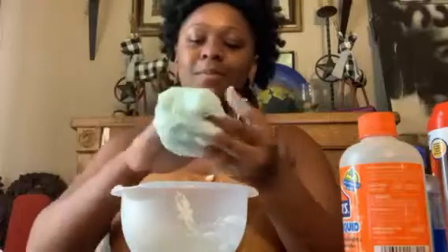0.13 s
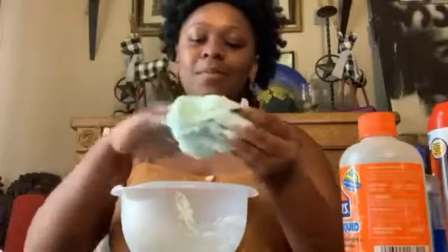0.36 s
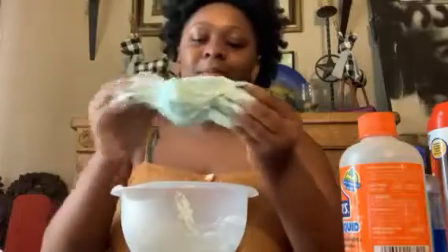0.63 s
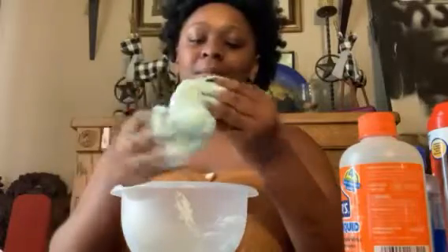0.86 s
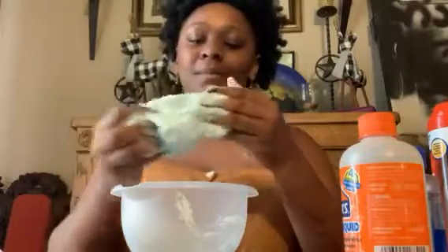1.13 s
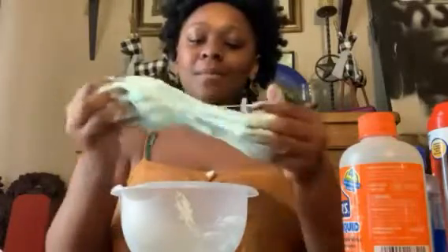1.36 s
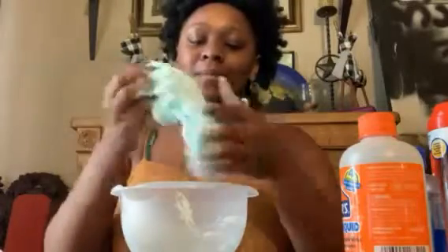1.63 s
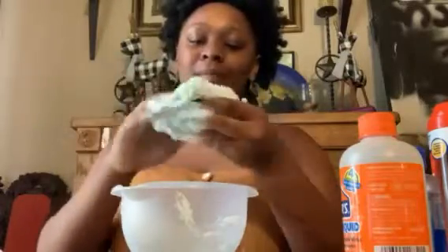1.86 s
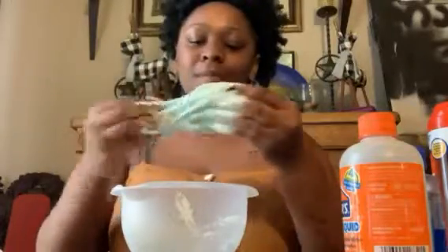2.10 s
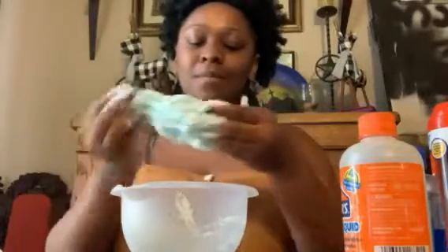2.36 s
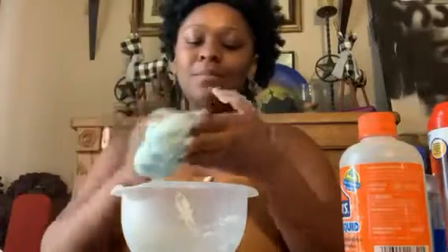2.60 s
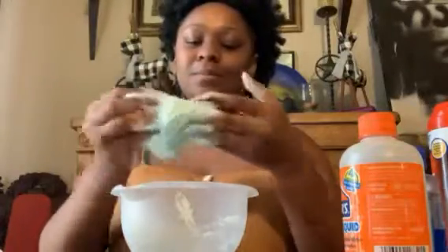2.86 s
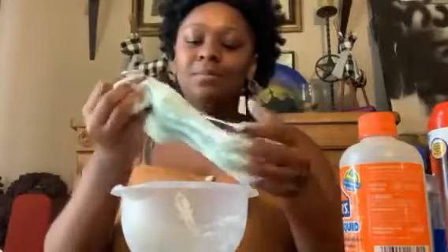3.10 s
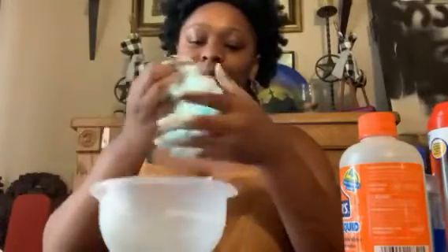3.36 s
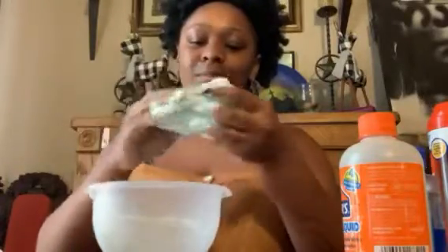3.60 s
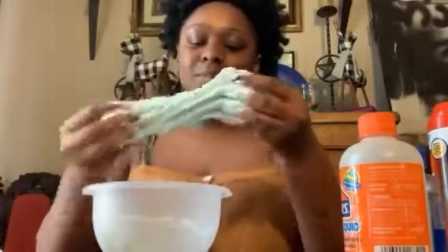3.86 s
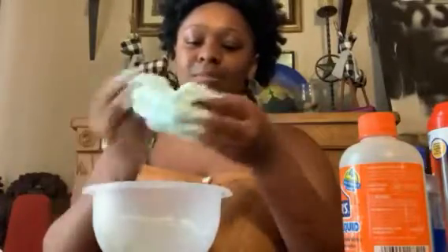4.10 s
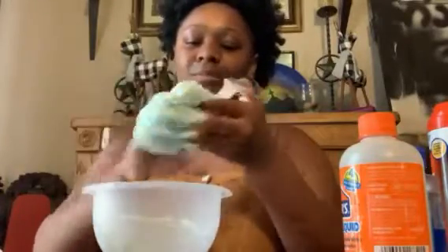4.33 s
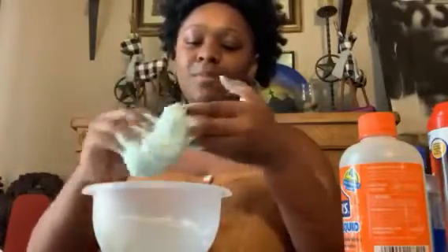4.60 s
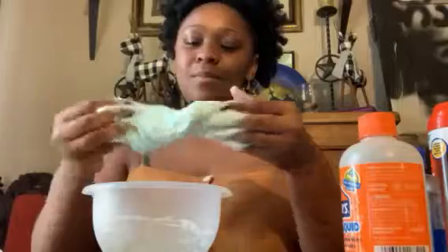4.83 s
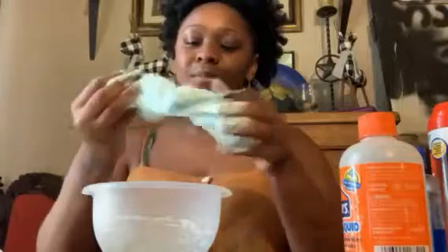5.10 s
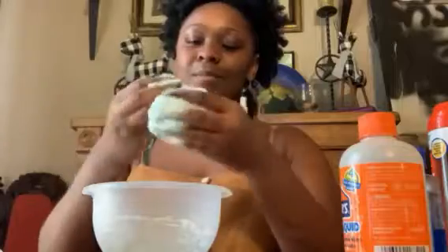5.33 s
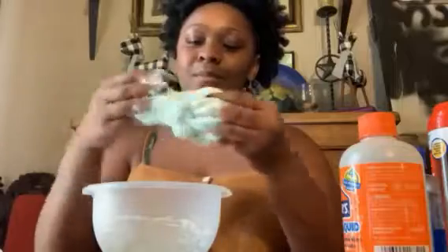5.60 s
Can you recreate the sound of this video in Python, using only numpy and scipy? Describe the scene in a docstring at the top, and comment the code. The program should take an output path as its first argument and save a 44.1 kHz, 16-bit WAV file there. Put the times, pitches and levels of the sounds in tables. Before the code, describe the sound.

Fine wet crackles and bubble pops from hand-stretched slime in a quiet room, interrupted by a loud rattling bump on a table.

```python
"""Room tone and a thin whine, then hands kneading sticky slime: fine wet crackle with single pops.
Midway the table is jolted: it booms while a thing on it scrapes, crackles and rattles to rest.
A wavering low drone comes and goes; faint rubs and short squeaks join in.
Crackle is unevenly jumping noise plus bubble grains; pops are short cycles with noise bursts; the
jolt rings damped modes. Sparse reflections add a room; two close microphone ports pick it all up."""
import sys
import numpy as np
from scipy import signal
from scipy.fft import rfft, irfft, next_fast_len
from scipy.io import wavfile
from scipy.ndimage import uniform_filter1d

SR = 44100
rng = np.random.default_rng(int(sys.argv[2]) if len(sys.argv) > 2 else 0)


def makeup_ratio(level_db):
    """Linear amplitude ratio for a level in decibels (20 dB per factor of ten)."""
    decades = np.asarray(level_db, float) / 20
    return 10 ** decades


def store_pcm(level_fs):
    """Save levels as 16-bit WAV."""
    pcm = np.round(np.clip(level_fs, -1, 1) * 32767).astype(np.int16)
    wavfile.write(sys.argv[1], SR, np.atleast_2d(pcm).T)


N = 251811

# Room tone spectrum. Each row: frequency in Hz, relative density in dB.
AIR = [(18, -37), (46, 1.5), (86, 3), (289, -16.5), (809, -21), (1600, -27.5), (2090, -25), (2650, -30),
       (6150, -32.5), (11300, -31), (13900, -30), (16300, -61)]
# Likeness of the room tone at the two ports. Each row: frequency in Hz, correlation.
AIR_SAME = [(40, 0.4), (1000, 0.22), (12000, 0.16)]
# Thin whine. Each row: time in seconds, pitch in Hz, rms level in dB.
WHINE = [(0., 10960, -91), (4.38, 11020, -88.5), (4.42, 11130, -94), (5.7, 10960, -82)]
# Strokes of crackle, from slime and, between 3.2 and 3.8 s, from the jolt. Each row: peak time,
# rise and fall in seconds, crackle level in dB, tilt towards the lows in dB.
CRACKLE_STROKES = [(0.147, 0.071, 0.072, -61, -9), (.33, 0.024, 0.42, -66, -10.5),
                   (.54, 0.32, 0.091, -65.5, -17), (0.691, 0.079, 0.13, -62.5, -4.5),
                   (1.3, 0.77, 0.056, -67, -3.5), (1.429, 0.26, 0.041, -60.5, -37),
                   (1.82, 0.21, 0.21, -64, -12.5), (1.966, 0.036, 0.041, -55.5, -8.5),
                   (2.058, 0.093, 0.1, -58, -11), (2.345, 0.28, 0.31, -75, -3),
                   (2.733, 0.072, 0.081, -54, -6.5), (2.973, 0.7, 0.26, -60.5, -21.5),
                   (3.2, 0.091, 0.17, -74.5, 18), (3.449, 0.15, 0.088, -63, 17),
                   (3.668, 0.059, 0.063, -49.5, 5.5), (3.77, 0.12, 0.15, -61.5, -6.5),
                   (4.361, 0.33, 0.12, -62, -8.5), (4.609, 0.017, 0.041, -62, -13),
                   (4.69, 0.043, 0.17, -59, -11.5), (5.038, 0.3, 0.047, -67, -27),
                   (5.236, 0.017, 0.061, -66, 7), (5.373, 0.09, 0.13, -68, -4.5),
                   (5.517, 0.024, 0.12, -59, 4.5), (5.69, 0.24, 0.12, -59, -8)]
# Crackle spectrum. Each row: frequency in Hz, relative density in dB.
CRACKLE = [(120, -31), (200, -4), (329, 3), (650, -4.5), (796, -15.5), (1380, -3.5), (1540, -20), (2070, 3),
           (2590, -11.5), (4410, -6), (7120, -12.5), (11700, -5), (13800, -6), (16300, -34.5)]
# Bursting air pockets. Each row: cue in seconds (2 ms before the burst), level in dB,
# pocket pitch in Hz, relative snap level in dB.
POPS = [(0.117, -48.5, 2240, -14.5), (0.414, -38, 2370, -5.5), (0.422, -41, 2540, -13),
        (0.433, -48, 3200, -12), (0.457, -51, 1400, -22), (0.673, -34.5, 4400, -44),
        (0.679, -52, 3970, -28), (0.69, -45, 3000, -10), (0.698, -52.5, 2900, 5.5), (0.855, -48, 355, 1),
        (1.007, -44, 300, -2.5), (1.039, -37, 420, -10.5), (1.083, -47.5, 290, -0.5),
        (1.177, -39, 4700, -6.5), (1.207, -42.5, 1876, 0.5), (1.23, -37.5, 1340, -5.5),
        (1.252, -53, 1200, -11), (1.288, -52, 1200, 3), (1.323, -38.5, 4640, -19), (1.623, -49.5, 2140, -2),
        (1.701, -46, 1970, -13), (1.82, -44, 2190, -2), (1.955, -55.5, 2130, 7.5), (2.03, -48, 426, 2),
        (2.091, -56, 2010, 9), (2.335, -52, 1290, -2), (2.506, -50, 1400, -27), (2.723, -37.5, 338, -11.5),
        (2.744, -41, 705, -7), (2.869, -39, 2050, -23.5), (2.938, -42.5, 1820, -5.5),
        (2.97, -44.5, 1900, 3), (4.204, -39.5, 1720, -12), (4.34, -52, 884, 7.5), (4.69, -32.5, 634, -8),
        (4.729, -42.5, 677, 1.5), (4.889, -47, 1937, -1), (4.917, -40, 2116, -12), (4.93, -53, 2070, 0.5),
        (4.95, -39, 2080, -9), (5.042, -47, 1870, -8.5), (5.197, -47, 939, -18), (5.209, -38.5, 3260, -9),
        (5.238, -48, 405, -16), (5.285, -45.5, 2110, -12.5), (5.3636, -36, 4100, -5.5),
        (5.456, -37, 2350, -11.5), (5.504, -28, 4490, -20.5), (5.51, -35.5, 2215, -20),
        (5.522, -43.5, 2300, -2.5), (5.551, -41.5, 543, -3), (5.563, -36.5, 4820, -6),
        (5.604, -23, 2670, -19.5), (5.677, -40, 3240, -9.5)]
# Room decay. Each row: frequency in Hz, t60 in seconds.
ROOM = [(200, 0.55), (1000, 0.082), (4000, 0.32), (12000, 0.074)]
# Rubs that wake the bright modes. Each row: peak time, rise and fall in seconds, level in dB.
RUBS = [(1.2, 0.92, 0.32, -72.5), (3.78, 0.034, 0.28, -71.5), (4.02, 0.12, 0.15, -68),
        (4.944, 0.11, 0.12, -69)]
# Low drone, one list a passage. Each row: time in seconds, mean pitch in Hz, mean level in dB.
DRONE = [
    [(.3, 83.4, -76), (.55, 86.8, -70), (.9, 91.6, -62.5), (1.13, 95.8, -61), (1.3, 98.4, -75.5),
     (1.44, 96.6, -62), (1.7, 90.6, -94)],
    [(3.8, 76.3, -55.5), (4.19, 81.6, -58.5), (4.27, 78.4, -70), (4.4, 79.4, -59.5), (4.56, 82.3, -84),
     (4.64, 84.2, -60), (4.7, 85.5, -81.5)],
]
# Faint squeaks, one list each. Each row: time in seconds, mean pitch in Hz, mean level in dB.
SQUEAKS = [
    [(2.635, 560, -75), (2.68, 560, -64.5), (2.705, 540, -75)],
    [(2.765, 700, -67), (2.8, 650, -69), (2.815, 640, -66)],
]
# Creaking drags. Each row: peak time, rise and fall in seconds, level in dB.
DRAGS = [(3.14, 0.039, 0.037, -72.5), (3.195, 0.0232, 0.049, -41.5)]
# Modes of the dragged foot. Each row: frequency in Hz, relative level in dB, t60 in seconds.
DRAG_MODES = [(762, 1.5, 0.023), (900, -1.5, 0.028), (1377, -7.5, .02), (2072, -13.5, .018),
              (2330, -9.5, 0.017)]
# Knocks of the rattle. Each row: start in seconds, body peak in dB, hardness as relative crack
# level in dB, pitch in Hz about which the modes are loudest.
KNOCKS = [(3.117, -51.5, -11.5, 820), (3.245, -24.5, -22, 680), (3.253, -14.5, -18.5, 946),
          (3.259, -16, -20, 900), (3.27, -16.5, -16.5, 932.6), (3.279, -23, -21, 880),
          (3.287, -26, -20.5, 600), (3.379, -3, -15.5, 750), (3.395, -14.5, -23.5, 600),
          (3.407, -17, -30, 690), (3.421, -21.5, -23, 800), (3.4432, -13.5, -12, 960),
          (3.455, -20.5, -18, 900), (3.461, -22.5, -18.5, 850), (3.498, -19, -21.5, 460),
          (3.506, -20.5, -21, 850), (3.534, -19.5, -11, 1130), (3.543, -22, -28.5, 603),
          (3.548, -20.5, -27, 809), (3.562, -24, -19.5, 600), (3.582, -16, -17, 850),
          (3.615, -23.5, -15.5, 1000), (3.623, -22, -18, 850), (3.635, -20, -20, 870),
          (3.643, -21.5, -19.5, 780), (3.658, -20.5, -20, 790), (3.675, -22, -18.5, 900),
          (3.693, -26, -19.5, 900), (3.711, -26, -21.5, 700), (3.732, -29.5, -22, 750)]
# Body modes of the thing. Each row: nominal frequency in Hz, relative level in dB, t60 in seconds.
BODY = [(246.2, -13.5, .045), (301.5, -10.5, 0.045), (395.2, -4.5, 0.024), (560, -4, 0.019),
        (734, 0.5, 0.015), (850, -1, 0.017), (962, 2, 0.014), (1200, -6, 0.016), (1400, -4.5, 0.014),
        (1656, -6.5, 0.014)]
# Its bright modes. Each row: nominal frequency in Hz, relative level in dB, nominal t60 in seconds.
BRIGHT = [(2060, -8, 0.011), (2140, -3, 0.014), (2378, -12, 0.011), (3330, -14, 0.008)]
# Spectrum of the hard contact. Each row: frequency in Hz, relative density in dB.
CRACK = [(1410, -30.5), (2400, -19.5), (2730, -8.5), (3460, -4), (6950, -17.5), (13400, -27.5),
         (16000, -49)]
# Table-top modes. Each row: nominal frequency in Hz, relative level in dB, t60 in seconds.
TABLE_TOP = [(61.85, -6.5, 0.16), (90, -7, 0.13), (95.1, 2.5, .18), (115.6, 3.5, 0.11), (121.5, 4.5, 0.15)]
# Slides during the jolt. Each row: peak time, rise and fall in seconds, scrape level in dB.
SLIDES = [(3.262, 0.0092, 0.072, -40.5), (3.39, 0.018, 0.12, -32), (3.547, 0.052, 0.13, -32),
          (3.66, 0.095, 0.037, -33)]
# Phase between the ports. Each row: frequency in Hz, lead of the left in radians.
PORT_PHASE = [(0, 0), (1290, -0.3), (1550, 0.6), (1890, -0.1), (2670, -1.0), (3360, -0.0), (4050, -2.2),
              (6200, -0.3), (7320, -3.4), (8870, -2.6), (10700, -0.3), (13000, 0.1), (14600, 2.8),
              (16000, 3.3)]
# Level between the ports. Each row: frequency in Hz, left minus right in dB.
PORT_BALANCE = [(60, 5.5), (110, 2.5), (200, -1), (380, -1), (700, 3), (1290, -5.5), (2380, 2.5),
                (4400, -4), (8120, 9.5), (15000, -4)]

AIR_DB = -68
SAG_DB = 18  # a stroke is this much weaker at its two ends than at its peak
# decay beyond the ends of a stroke
CRACKLE_STOP_DB_PER_S, SLIDE_STOP_DB_PER_S, RUB_STOP_DB_PER_S, DRAG_STOP_DB_PER_S = 330, 100, 250, 470
SNAP_SHARE, FIZZ_SHARE = 1.2, 0.35  # uneven snaps against the even fizz beneath them
BUBBLE_LOW_HZ, BUBBLE_HIGH_HZ, BUBBLES_PER_S = 600, 4500, 300
BUBBLE_CYCLES, BUBBLE_GLIDE = 3, 0.25
BUBBLE_DB = -6  # against the low part of the crackle
WIDE_BELOW_HZ, WIDE_HZ = 800, 3000  # large pockets smack over a wide band; small ones near their pitch
RUB_DAMPING, RUB_SHIFT = 0.99, 1.019  # the rubbing contact shortens the ring and stiffens the modes
WAVER_DB, OCTAVE_WAVER_DB = 2.5, 3.5  # rms of the random swelling of the partials
PITCH_WAVER, SQUEAK_BLUR = 0.02, 0.02  # rms shares of pitch
OCTAVE_DB, OCTAVE_DB_PER_HZ = -14, 0.8  # second partial where the first is at 90 Hz; growth with pitch
SPOT_DB = 4  # how much the struck spot changes each mode
FOCUS_DB_PER_OCTAVE = 9  # modes far from the loudest ring of a knock are weaker
BRIGHT_DB, BRIGHT_PER_HARDNESS = 8.5, 1  # harder knocks wake the bright modes more


def evened(x):
    """Scales to rms 1."""
    return x / np.sqrt(np.mean(x ** 2) + 1e-20)


def read(points, hz):
    """Reads a spectrum table on a log-frequency axis."""
    f, value = np.transpose(points)
    return np.interp(np.log(hz + 1), np.log(f + 1), value)


def add(mix, s, sound):
    """Mixes a sound in at time s."""
    part = mix[..., round(s * SR):][..., :sound.shape[-1]]
    part += sound[..., :part.shape[-1]]


def follow(rows):
    """Columns of a curve at every sample of its span, and a soft fade at both ends."""
    s, *columns = np.transpose(rows)
    t = np.arange(s[0], s[-1], 1 / SR)
    return s[0], signal.windows.tukey(len(t), 0.1), [np.interp(t, s, c) for c in columns]


def coloured(x, points):
    """Gives x the spectrum of a table."""
    size = next_fast_len(x.shape[-1])
    gain = makeup_ratio(read(points, np.fft.rfftfreq(size, 1 / SR)))
    return irfft(rfft(x, size) * gain, size)[..., :x.shape[-1]]


def filtered(x, order, hz, kind="low"):
    """Butterworth filter along the last axis."""
    return signal.sosfilt(signal.butter(order, hz, kind, fs=SR, output="sos"), x)


def smooth_noise(samples):
    """Slow random curve of rms 1."""
    return evened(uniform_filter1d(uniform_filter1d(rng.standard_normal(N), samples), samples))


def ring(modes, shift=0.97, phase=0., rise=0.001):
    """The sum of dying modes after one blow, peak 1."""
    t = np.arange(SR // 4) / SR
    hz, db, t60 = np.transpose(modes)[:, :, None]
    decay = makeup_ratio(db - 60 * t / t60)
    out = (decay * np.sin(2 * np.pi * hz * shift * t + phase)).sum(0) * (1 - np.exp(-t / rise)) ** 2
    return out / abs(out).max()


def grains(per_s, spread_db):
    """Sparse clicks of random sign, a few of them large."""
    size = makeup_ratio(spread_db * np.minimum(rng.exponential(1, N), 4)) * rng.choice([-1, 1], N)
    return size * (rng.random(N) < per_s / SR)


def strokes(rows, stop_db_per_s):
    """One gain curve a row, every 64 samples: swells to the peak, sags, stops fast past its ends."""
    peak, rise, fall, db = np.transpose(rows)[:4, :, None]
    t = np.arange(0, N + 64, 64) / SR - peak
    reach = np.maximum(np.where(t < 0, rise, fall), 0.005)
    sag_db = SAG_DB * np.minimum(abs(t) / reach, 1)
    return makeup_ratio(db - sag_db - stop_db_per_s * np.maximum(abs(t) - reach, 0))


def summed(gains):
    """Adds gain curves by power and reads them at every sample."""
    return np.interp(np.arange(N) / 64, np.arange(gains.shape[1]), np.sqrt((gains ** 2).sum(0)))


def air():
    """Room tone with drifting patches, lumpier in the bass, partly alike at both ports."""
    frames, hz = N // 256 + 5, np.fft.rfftfreq(1024, 1 / SR)
    a, b, c, d, patches = rng.standard_normal((frames, 513, 5)).T
    patches = evened(uniform_filter1d(uniform_filter1d(patches, 3, 0), 16, 1))
    same = np.clip(read(AIR_SAME, hz), -1, 1)[:, None]
    left = a + 1j * b
    right = same * left + np.sqrt(1 - same ** 2) * (c + 1j * d)
    patch_db = (4.0 + 1.0 / (1 + (hz[:, None] / 700) ** 2)) * patches
    z = np.array([left, right]) * makeup_ratio(read(AIR, hz)[:, None] + patch_db)
    return makeup_ratio(AIR_DB) * evened(signal.istft(z, nperseg=1024, noverlap=768)[1][:, :N])


def whine():
    """One thin sine that wanders about its pitch curve."""
    out = np.zeros(N)
    wander_hz = 25 * evened(uniform_filter1d(rng.standard_normal(N), 900))
    s, _, (hz, db) = follow(WHINE)
    turn = 2 * np.pi * np.cumsum(hz + wander_hz[:len(hz)]) / SR
    add(out, s, np.sqrt(2) * makeup_ratio(db) * np.sin(turn))
    return out


def snaps(per_s, samples):
    """A fizz whose loudness jumps with every snap; snaps come in clumps."""
    clumps = makeup_ratio(1.4 * evened(uniform_filter1d(rng.standard_normal(N), 700)))
    size = uniform_filter1d(abs(grains(per_s, spread_db=4.5)), samples)
    loudness = (SNAP_SHARE * evened(size) + FIZZ_SHARE) * clumps
    return coloured(loudness * rng.standard_normal(N), CRACKLE)


def bubbles():
    """Small pockets squish at scattered pitches, each a few cycles that glide up or down."""
    out = np.zeros(N)
    for k, hz in enumerate(np.geomspace(BUBBLE_LOW_HZ, BUBBLE_HIGH_HZ, num=16)):
        u = np.arange(0, 6 * BUBBLE_CYCLES / hz, 1 / SR) * hz / BUBBLE_CYCLES
        glide = 1 + (-1) ** k * BUBBLE_GLIDE * np.tanh(u)
        grain = u * np.exp(-2 * u) * np.sin(2 * np.pi * BUBBLE_CYCLES * u * glide)
        clicks = grains(BUBBLES_PER_S / 16, spread_db=2.5)
        out += signal.oaconvolve(clicks, grain / np.linalg.norm(grain))[:N]
    return makeup_ratio(BUBBLE_DB) * evened(out)


def crackle():
    """Short snaps crackle in the treble, longer ones lower; each stroke has its own share of lows."""
    gains, tilt_db = strokes(CRACKLE_STROKES, CRACKLE_STOP_DB_PER_S), np.transpose(CRACKLE_STROKES)[4]
    both = snaps(580, 30)
    low = evened(filtered(both + 2.5 * snaps(300, 80), 2, 6000))
    high = evened(filtered(both + snaps(460, 24), 2, 6000, "high"))
    return summed(gains) * high + summed(gains * makeup_ratio(tilt_db)[:, None]) * (low + bubbles())


def pops():
    """A pocket bursts: a cycle or two at its pitch, a smack, a treble snap."""
    lead_s = 0.01
    out, t = np.zeros(N), np.arange(2000) / SR - lead_s - 0.002
    noise = rng.standard_normal((len(POPS), 3, len(t)))
    treble = filtered(noise[:, 1], 3, [7500, 15000], "band")
    ragged = makeup_ratio(1.7 * evened(uniform_filter1d(noise[:, 2], 60)))
    core = np.where(t < 0, np.exp(t / 0.00045), np.exp(-t / 0.0006))
    # uneven soft noise around the burst
    skirt = np.where(t < 0, 0.16 * np.exp(t / 0.0041), 0.17 * np.exp(-t / 0.0046))
    for (s, db, hz, snap_db), mid, top, rag in zip(POPS, noise[:, 0], treble, ragged):
        centre_hz = hz if hz > WIDE_BELOW_HZ else WIDE_HZ
        swell = np.maximum(t * hz / 0.58 + 0.49, 0)
        pocket = 0.71 * swell * np.exp(-swell) * np.sin(2 * np.pi * hz * t)
        burst = core + skirt * rag
        smack = evened(filtered(mid, 2, [centre_hz / 1.97, centre_hz * 1.98], "band")) * burst
        snap = top * burst
        smack = 0.5 * smack / abs(smack).max()
        snap = 1.97 * makeup_ratio(snap_db) * snap / abs(snap).max()
        add(out, s - lead_s, makeup_ratio(db) * (pocket + smack + snap))
    return out


def room(x):
    """Sparse reflections of random sign, each band dying at its own speed."""
    taps = np.zeros((2, SR // 2))
    slots = np.arange(130, SR // 2 - 20, 20)
    at = slots + rng.integers(0, 20, (2, len(slots)))
    np.put_along_axis(taps, at, rng.choice([-1., 1.], at.shape), 1)
    hz, t, z = signal.stft(taps, SR, nperseg=256)
    tail = signal.istft(z * makeup_ratio(-60 * t / read(ROOM, hz)[:, None]), SR, nperseg=256)[1]
    return signal.fftconvolve(x[None], tail / np.linalg.norm(tail[0]), axes=1)[:, :N]


def rub():
    """Tiny slips ring the bright modes only."""
    damped = ring(np.multiply(BRIGHT, [1, 1, RUB_DAMPING]), RUB_SHIFT)
    slips = grains(per_s=380, spread_db=3.0)
    return summed(strokes(RUBS, RUB_STOP_DB_PER_S)) * evened(signal.oaconvolve(slips, damped)[:N])


def drone():
    """A low tone of wavering pitch and level; its second partial grows as the pitch rises."""
    out = np.zeros(N)
    pitch, first, second = (smooth_noise(1800) for _ in range(3))
    for rows in DRONE:
        s, fade, (hz, db) = follow(rows)
        span = slice(round(s * SR), round(s * SR) + len(hz))
        turn = 2 * np.pi * np.cumsum(hz * (1 + PITCH_WAVER * pitch[span])) / SR
        octave_db = OCTAVE_DB + OCTAVE_DB_PER_HZ * np.minimum(hz - 90, 10) + db
        octave = makeup_ratio(octave_db + OCTAVE_WAVER_DB * second[span]) * np.sin(2 * turn)
        tone = makeup_ratio(db + WAVER_DB * first[span]) * np.sin(turn)
        add(out, s, np.sqrt(2) * fade * (tone + octave))
    return out


def squeaks():
    """Single sines whose pitch is blurred by slow and quick random wavering."""
    out = np.zeros(N)
    pitch, level, blur = smooth_noise(1800), smooth_noise(1800), smooth_noise(250)
    for rows in SQUEAKS:
        s, fade, (hz, db) = follow(rows)
        span = slice(round(s * SR), round(s * SR) + len(hz))
        waver = PITCH_WAVER * pitch[span] + SQUEAK_BLUR * blur[span]
        turn = 2 * np.pi * np.cumsum(hz * (1 + waver)) / SR
        add(out, s, np.sqrt(2) * fade * makeup_ratio(db + WAVER_DB * level[span]) * np.sin(turn))
    return out


def drag():
    """The thing first drags with a creak: quick uneven slips of its foot ring a tighter set of modes."""
    slips = grains(per_s=800, spread_db=1.5)
    creak = evened(signal.oaconvolve(slips, ring(DRAG_MODES, 1))[:N])
    return summed(strokes(DRAGS, DRAG_STOP_DB_PER_S)) * creak


def rattle():
    """Every knock strikes another spot of the rocking thing, so its modes shift and mix differently."""
    out, t = np.zeros(N), np.arange(SR // 4) / SR
    spot = rng.uniform(-1.14, 1, (len(KNOCKS), 3, len(BODY), 1))
    cracks = evened(coloured(rng.standard_normal((len(KNOCKS), len(t))), CRACK))
    sharp = np.exp(-t / 0.0013) * (1 - np.exp(-t / 0.0009)) ** 2
    lasting = np.exp(-t / 0.013) * (1 - np.exp(-t / 0.00051))
    mode_hz, few = np.transpose(BODY)[0][:, None], len(BRIGHT)
    for (s, db, crack_db, ring_hz), (phase, shift, share), crack in zip(KNOCKS, spot, cracks):
        far_db = FOCUS_DB_PER_OCTAVE * abs(np.log2(mode_hz / ring_hz))
        modes = np.array(BODY) + (SPOT_DB * share - far_db) * [0, 1, 0]
        body = ring(modes, 1 + 0.041 * shift, 1.88 * phase, rise=0.0037)
        bright = ring(BRIGHT, 1 + 0.033 * shift[:few], phase[:few])
        bright = makeup_ratio(BRIGHT_DB + BRIGHT_PER_HARDNESS * crack_db) * bright
        contact = makeup_ratio(crack_db) * crack * (3 * sharp + 0.14 * lasting)
        add(out, s, makeup_ratio(db) * (body + bright + contact))
    return out


def boom():
    """Each knock pushes the table top up or down and the slide shakes it; it swells and rings low."""
    blows = 0.05 * summed(strokes(SLIDES, SLIDE_STOP_DB_PER_S)) * rng.standard_normal(N)
    for k, (s, db, *_) in enumerate(KNOCKS):
        # the rocking thing lands on alternate edges
        add(blows, s, (-1) ** k * makeup_ratio(0.75 * db - 17) * np.ones(1))
    return signal.oaconvolve(blows, ring(TABLE_TOP, rise=0.044))[:N]


def jolt():
    """The sliding contact slips unevenly and scrapes the body modes."""
    slide = summed(strokes(SLIDES, SLIDE_STOP_DB_PER_S))
    slips = evened(grains(per_s=620, spread_db=2.0))
    contact = ring(BODY) + 0.14 * ring(BRIGHT)
    scrape = signal.oaconvolve(slips * slide, contact / np.linalg.norm(contact))[:N]
    grit = 0.09 * slide * evened(coloured(slips, CRACK))
    return scrape + grit


def scene():
    """Crackle and pops in the air, knocks through the table, tones, reflections and room tone."""
    airborne = crackle() + pops()
    knocks = drag() + rattle() + jolt()
    tones = whine() + drone() + squeaks()
    wet = makeup_ratio(-8) * room(airborne) + makeup_ratio(-10) * room(knocks)
    return airborne + knocks + boom() + rub() + tones + wet + air()


def band_limit(x):
    """A steep low-pass at the top of the band."""
    return signal.sosfilt(signal.butter(12, 16460, fs=SR, output="sos"), x)


def record(dry):
    """The two ports differ in phase and level by frequency."""
    size = next_fast_len(N + 4096)
    hz = np.fft.rfftfreq(size, 1 / SR)
    port = makeup_ratio(read(PORT_BALANCE, hz) / 2) * np.exp(0.5j * read(PORT_PHASE, hz))
    ported = irfft(rfft(dry, size) * np.array([port, 1 / port]), size)[:, :N]
    return band_limit(ported)


dry = scene()
out = record(dry)
store_pcm(out)
```